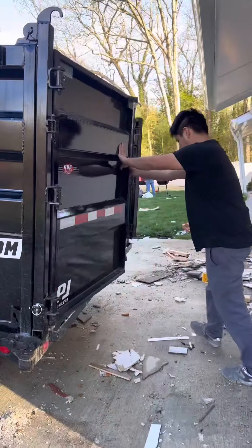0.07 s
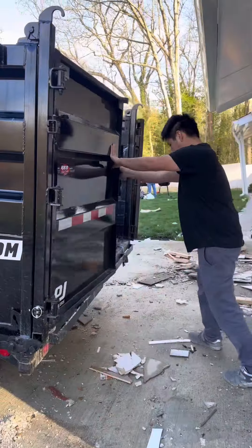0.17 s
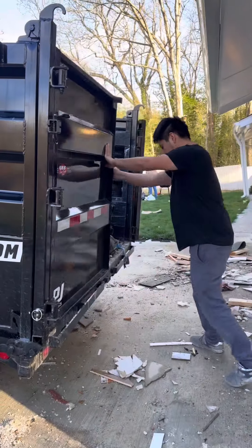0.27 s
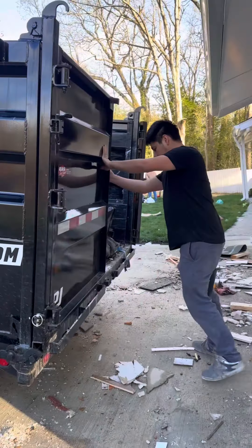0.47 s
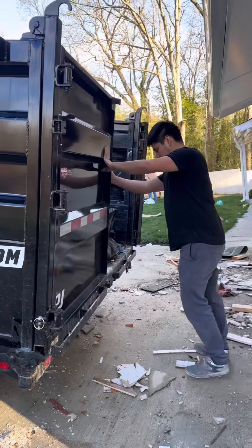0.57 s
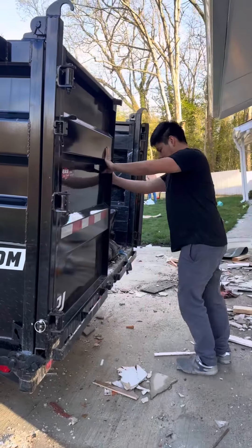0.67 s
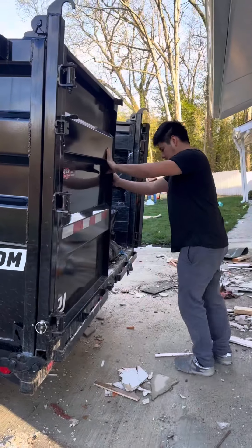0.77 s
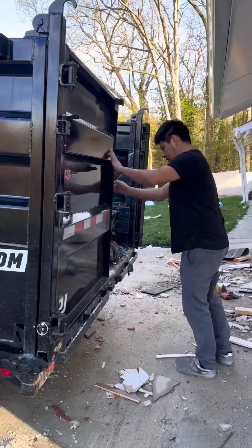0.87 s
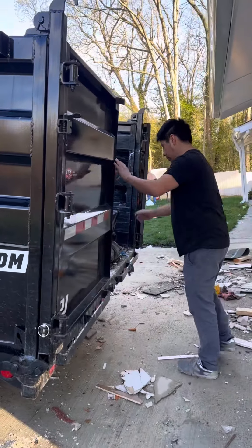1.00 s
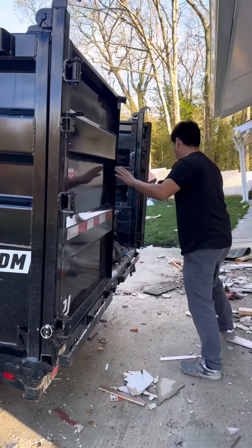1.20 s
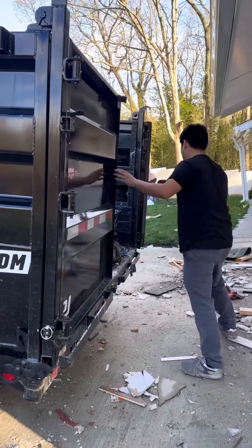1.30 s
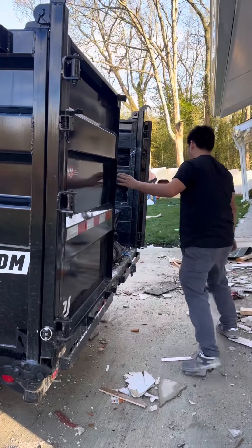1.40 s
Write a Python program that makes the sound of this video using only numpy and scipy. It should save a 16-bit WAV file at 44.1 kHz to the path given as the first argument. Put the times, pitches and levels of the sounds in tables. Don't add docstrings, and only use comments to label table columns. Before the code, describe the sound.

Big metal door bangs closed, its hardware chattering and ringing, then light scuffs and latch ticks

```python
import sys
import numpy as np
from scipy import signal
from scipy.fft import irfft
from scipy.io import wavfile
from scipy.ndimage import uniform_filter1d

SR = 44100
rng = np.random.default_rng(int(sys.argv[2]) if len(sys.argv) > 2 else 0)


def inscribe(sig):
    pcm = np.round(np.clip(np.atleast_2d(sig).T, -1, 1) * 32767)
    wavfile.write(sys.argv[1], SR, pcm.astype(np.int16))


def magnitude_from_level(level_db):
    exponent = np.asarray(level_db, float) / 20
    return 10 ** exponent


N = 63945

# start in seconds, force on panel in dB, force on loose hardware in dB.
CONTACTS = [(0.237, -23.5, -49.5), (0.2493, -9, -21), (.272, -12, -19), (0.287, -15, -20),
            (0.305, -10.5, -20), (0.317, -10.5, -20.5), (0.335, -11, -22), (0.354, -16, -22.5),
            (0.37, -13.5, -27), (.396, -14.5, -22.5), (0.426, -16.5, -26), (0.442, -19.5, -28.5),
            (0.466, -25.5, -38), (0.477, -22, -29), (0.507, -29, -46.5), (0.533, -45, -62),
            (0.567, -58, -73), (0.585, -50, -79)]
# frequency in Hz, level in dB per Hz.
PANEL_SPECTRUM = [(80, -16), (200, -6), (700, -11), (1500, -14), (3000, -19.5), (5000, -31), (10000, -46.5)]
# frequency in Hz, t60 in seconds.
PANEL_T60 = [(100, 0.36), (400, 0.29), (1200, 0.23), (4000, 0.048)]
# frequency in Hz, energy in dB, t60 in seconds.
TAIL_MODES = [(230.6, -19, 0.53), (272, -25, 3.6), (427, -25, 1.1), (623, -23, 1.6), (791, -30.5, 1),
              (1060, -31.5, 1.6)]
# frequency in Hz, level in dB per Hz.
HARDWARE_SPECTRUM = [(2000, -7.5), (3000, -13.5), (5000, -13.5), (6500, -7), (8200, -22), (10000, -34)]


def door():
    late_t60_s, late_cut_hz, hardware_t60_s = 1.104, 685, 0.1
    shapes = np.array([swell(row[0], rise_s=0.0018, fall_s=0.0093) for row in CONTACTS])
    chatter = [clicks(per_s=2500, spread_db=3) for _ in range(2)]
    panel_force, hardware_force = magnitude_from_level(np.array(CONTACTS)[:, 1:]).T @ shapes * chatter

    late_spectrum = [(hz, db - 20 * np.log10(1 + (hz / late_cut_hz) ** 2)) for hz, db in PANEL_SPECTRUM]
    panel = dense_body(PANEL_SPECTRUM, lambda hz: at_hz(PANEL_T60, hz), spots=5, length_s=0.5)
    late_panel = dense_body(late_spectrum, lambda hz: late_t60_s, spots=2, length_s=0.98)
    hardware = dense_body(HARDWARE_SPECTRUM, lambda hz: hardware_t60_s, spots=8, length_s=0.12)

    out = magnitude_from_level(0.5) * strike(panel_force, panel)
    out = out + magnitude_from_level(-7) * strike(panel_force, late_panel)
    out = out + magnitude_from_level(5) * strike(hardware_force, hardware)
    out = out + strike(panel_force, named_body(TAIL_MODES))
    rebound = burst(0.432, 0.006, 0.05, -20, 1800, width=1.4)
    return out + rings() + crack() + rebound


# start in seconds, frequency in Hz, peak in dB, swell in seconds, t60 in seconds.
RINGS = [(.25, 62.7, -12, 0.026, 0.17), (.35, 59, -20.5, 0.011, 0.24), (.43, 53, -26.5, .02, .5),
         (.585, 41, -28, 0.023, .6), (.252, 211, -13.5, 0.035, 0.16), (.34, 204, -14.5, 0.015, 0.17),
         (.39, 160, -23, .02, 0.44), (.583, 180, -30.5, 0.0054, 0.34), (.25, 102.4, -17.5, .008, 0.1),
         (0.299, 341, -16, .006, .25), (.43, 285, -20.5, 0.0098, .3), (.43, 425, -26, 0.017, .35),
         (.248, 455, -17, 0.0053, 0.18), (.345, 402, -24, .01, 0.24), (.262, 630, -14.5, .02, 0.12),
         (.505, 630, -30, .015, 0.28), (.246, 735, -12, 0.0013, 0.11), (.427, 610, -21, 0.013, 0.054),
         (.246, 900, -19.5, 0.0024, 0.14), (.325, 1007, -17, .1, .23), (.325, 1042, -16.5, .3, .29),
         (.33, 1314, -24, 0.027, 0.27), (.335, 1510, -24, 0.022, 0.34), (.31, 2370, -21.5, 0.015, 0.37),
         (.34, 1300, -22.5, 0.011, 0.22), (.422, 2500, -30.5, 0.017, 0.15), (.42, 1845, -21.5, .006, 0.18),
         (0.38, 2440, -30.5, 0.01, 0.14), (0.36, 3900, -26.5, .008, 0.066),
         (0.39, 3500, -24.5, 0.0034, 0.1), (0.62, 235, -35.5, 0.033, 0.52),
         (.39, 640, -22.5, 0.0033, 0.097), (0.27, 1400, -27.5, .02, .4), (0.25, 1000, -24.5, 0.0085, .2)]
# start in seconds, frequency in Hz, peak in dB, swell in seconds, t60 in seconds.
PINGS = [(1.324, 2340, -53, .005, .16), (1.344, 2600, -50, .001, .06), (1.3445, 540, -33, .001, .022),
         (1.4325, 2300, -47, .0005, .015), (1.443, 2320, -54, .001, .03), (1.19, 1950, -48, .006, .1),
         (.853, 1850, -47, .0005, .025), (.932, 1750, -52, .002, .04), (.9, 622, -55, .05, .6),
         (1.0, 1030, -62, .05, 1.5), (1.24, 520, -46, .008, .1)]


def rings():
    start_s, hz, peak_db, rise_s, t60_s = np.transpose(np.vstack([RINGS, PINGS]))[:, :, None]
    t = np.maximum(np.arange(N) / SR - start_s, 0)
    shape = (1 - np.exp(-t / rise_s)) * np.exp(-np.log(1000) * t / t60_s)
    shape = magnitude_from_level(peak_db) * shape / shape.max(axis=1, keepdims=True)
    waver_rad = 0.45 * np.array([drift(10) for _ in start_s])
    alike, lean = stereo(hz)
    turn = np.arccos(alike) / 2
    phase = 2 * np.pi * hz * t + waver_rad
    left = lean * shape * np.sin(phase - turn)
    right = shape * np.sin(phase + turn) / lean
    return np.array([left.sum(axis=0), right.sum(axis=0)])


# relative length, level in dB.
CRACK_PATHS = [(.85, -5), (1, 0), (1.35, -4), (1.7, -9)]


def crack():
    start_s, top_hz = 0.2422, 3400
    delay_1khz_s = 0.008
    hz = np.maximum(np.fft.rfftfreq(N, 1 / SR), 1)
    colour = (hz / 400) ** 2 / (1 + (hz / 400) ** 2) / (1 + (hz / top_hz) ** 4)
    late = sum(magnitude_from_level(db) * np.exp(-4j * np.pi * length * delay_1khz_s * np.sqrt(1000 * hz))
               for length, db in CRACK_PATHS)
    snap = irfft(colour * late * np.exp(-2j * np.pi * hz * start_s), N)
    return magnitude_from_level(-2) * snap / np.abs(snap).max() * magnitude_from_level([[1.5], [-1.5]])


# frequency in Hz, energy in dB, t60 in seconds.
HANDLE_MODES = [(3790, -8.5, 0.088), (3860, -3.5, 0.12), (4050, -7, .07), (6200, -6.5, .15),
                (7780, 8.5, 0.087), (8000, -1, .1), (8260, 7, 0.095)]


def latch():
    tick = np.zeros(N)
    tick[int(1.008 * SR)] = magnitude_from_level(-36)
    return strike(tick, named_body(HANDLE_MODES))


# peak in seconds, rise in seconds, fall in seconds, level in dB, centre in Hz.
SCUFFS = [(0.027, 0.0036, 0.0067, -54, 6000), (0.039, .002, 0.0035, -48, 5000),
          (0.061, 0.007, 0.024, -44.5, 6500), (0.101, 0.0037, 0.0085, -57, 7500),
          (0.212, 0.0022, 0.038, -50, 5100), (0.743, 0.036, 0.018, -53, 3560),
          (0.855, 0.0012, 0.019, -55, 5070), (1.195, .003, 0.027, -47.5, 4490),
          (1.234, 0.024, 0.018, -30, 4520), (1.264, 0.025, 0.022, -43, 5550),
          (1.345, .001, 0.012, -51.5, 5000), (0.93, 0.0016, 0.017, -65, 2970),
          (1.008, 0.0015, 0.018, -58, 6900)]
# peak in seconds, rise in seconds, fall in seconds, level in dB, centre in Hz.
KNOCKS = [(.075, 0.011, 0.012, -57, 824), (.138, .001, 0.02, -47, 1300), (.158, 0.012, 0.018, -45, 1500),
          (.177, 0.008, 0.012, -48, 1500), (0.853, 0.0011, 0.02, -48, 1820),
          (0.931, 0.0061, 0.019, -48.5, 1850), (1.249, 0.012, 0.028, -45, 560),
          (1.229, 0.014, 0.015, -42.5, 1250), (1.205, 0.017, 0.048, -40, 1950),
          (1.231, 0.0103, 0.024, -36, 2100), (1.334, 0.022, 0.032, -58, 2300),
          (1.35, 0.003, 0.012, -42, 474), (1.435, .002, 0.012, -54, 3200), (1.432, .002, .008, -53, 6840)]


def shoes():
    scuffs = sum(burst(*row, width=1.62) for row in SCUFFS)
    return scuffs + sum(burst(*row, width=1.5) for row in KNOCKS)


# frequency in Hz, level in dB per Hz.
RUMBLE_SPECTRUM = [(13, -67.5), (22, -29), (43, -6.5), (70, 0), (237, -18.5), (276, -27), (1050, -35.5),
                   (1790, -55), (2000, -51.5), (2600, -77), (4400, -120)]
# frequency in Hz, level in dB per Hz.
HISS_SPECTRUM = [(880, -34.5), (1500, -0.5), (1660, -8), (10000, -48), (13000, -66), (22000, -120)]
# frequency in Hz, level in dB per Hz.
RUSTLE_SPECTRUM = [(710, -66.5), (1200, -31.5), (2230, -6.5), (5100, -16), (6080, -8.5), (10000, -10.5),
                   (13000, -46), (22000, -120)]
# time in seconds, level in dB.
STIR = [(0, -58.5), (.22, -53), (0.551, -60.5), (0.871, -56.5), (.98, -62.5), (1.1, -70.5), (1.179, -77),
        (1.299, -54), (1.45, -57.5)]
# frequency in Hz, left-right likeness.
FAR_LIKENESS = [(60, 3), (130, -0.07), (290, 0.97), (640, 0.25), (1410, 0.8), (3100, 0), (6820, 0.4),
                (15000, -2.5)]


def yard():
    stir_db = np.interp(np.arange(N) / SR, *np.transpose(STIR))
    rumble = magnitude_from_level(-33.5) * banded_noise(RUMBLE_SPECTRUM, FAR_LIKENESS, patchy_db=2.5)
    hiss = magnitude_from_level(-83) * banded_noise(HISS_SPECTRUM, FAR_LIKENESS, patchy_db=-2.0)
    rustle = magnitude_from_level(stir_db) * banded_noise(RUSTLE_SPECTRUM, FAR_LIKENESS, patchy_db=2.0)
    return rumble + hiss + rustle


def strike(force, answers):
    spots = rng.integers(0, answers.shape[1], N) == np.arange(answers.shape[1])[:, None]
    return signal.fftconvolve((force * spots)[None], answers, axes=2)[..., :N].sum(axis=1)


def dense_body(spectrum, t60_at, spots, length_s):
    bloom_cycles = 0.46
    t, out = np.arange(int(length_s * SR)) / SR, 0
    white = rng.standard_normal((2, 2, spots, len(t)))
    for k, (low, high) in enumerate(half_octaves(64, 7.6, spectrum)):
        mid, side = bandpass(white[k % 2], low, high)
        hz = np.sqrt(low * high)
        alike, lean = stereo(hz)
        shape = np.exp(-np.log(1000) * t / t60_at(hz)) * (1 - np.exp(-t * hz / bloom_cycles))
        gain = magnitude_from_level(at_hz(spectrum, hz)) * shape / np.sqrt(np.sum(shape ** 2))
        side = np.sqrt(1 - alike) * turned(mid, side, hz)
        mid = np.sqrt(1 + alike) * mid
        out = out + gain * np.array([lean * (mid + side), (mid - side) / lean])
    return out / np.sqrt(np.sum(out ** 2) / 2 / spots)


def turned(mid, side, hz):
    share = 0.62
    quarter_turn = np.gradient(mid, axis=-1) / np.sin(2 * np.pi * hz / SR)
    return -share * quarter_turn + np.sqrt(1 - share ** 2) * side


def named_body(modes):
    hz, db, t60_s = np.transpose(modes)
    t = np.arange(SR // 2) / SR
    alike, lean = stereo(hz)
    turn = np.arccos(alike) / 2
    level = magnitude_from_level(db) / np.sqrt(t60_s * SR / (4 * np.log(1000)))
    weight = level * np.array([lean * np.exp(1j * turn), np.exp(-1j * turn) / lean])
    decaying = np.exp(np.outer(2j * np.pi * hz - np.log(1000) / t60_s, t))
    return (weight @ decaying).imag[:, None]


def burst(peak_s, rise_s, fall_s, db, hz, width):
    grit, own = clicks(per_s=4900, spread_db=-3.5), rng.standard_normal(N)
    alike, _ = stereo(hz)
    pair = np.sqrt(1 + alike) * grit + np.sqrt(1 - alike) * own * [[1], [-1]]
    band = bandpass(pair, hz / width, min(hz * width, 15000))
    return magnitude_from_level(db) * rms_one(band) * swell(peak_s, rise_s, fall_s)


def banded_noise(spectrum, likeness, patchy_db):
    out, together = 0, drift(8.2)
    settle = 8000
    white = rng.standard_normal((2, 2, N + settle))
    for k, (low, high) in enumerate(half_octaves(16, 9.6, spectrum)):
        mid, side = bandpass(white[k % 2], low, high)[:, settle:]
        hz = np.sqrt(low * high)
        alike = np.clip(at_hz(likeness, hz), -1, 1)
        gain = magnitude_from_level(at_hz(spectrum, hz) + patchy_db * (0.15 * together + drift(5.6)))
        out = out + gain * (np.sqrt(1 + alike) * mid + np.sqrt(1 - alike) * side * [[1], [-1]])
    return rms_one(out)


def clicks(per_s, spread_db):
    sizes = magnitude_from_level(spread_db * np.minimum(rng.exponential(1, N), 4)) * rng.choice([-1, 1], N)
    return rms_one(sizes * (rng.random(N) < per_s / SR))


def swell(peak_s, rise_s, fall_s):
    t = np.arange(N) / SR - peak_s
    return np.exp(np.where(t < 0, 2 * t / rise_s, -t / fall_s))


def drift(rate):
    r = np.exp(-80 * np.pi * rate / SR)
    slow = signal.lfilter([1], [1, -2 * r, r * r], rng.standard_normal(N // 40 + 2002))[2000:]
    return np.interp(np.arange(N) / 40, np.arange(len(slow)), rms_one(slow))


# frequency in Hz, left-right likeness.
LIKENESS = [(130, 1), (290, .9), (640, .75), (1410, .78), (3100, .55), (5500, .3), (9000, -.5)]
# frequency in Hz, left minus right in dB.
LEAN = [(200, 0.1), (500, 4.5), (1200, 5), (2400, 1.5), (8000, 0.1)]


def stereo(hz):
    return np.clip(at_hz(LIKENESS, hz), -1, 1), magnitude_from_level(at_hz(LEAN, hz) / 2)


def half_octaves(start_hz, octaves, spectrum):
    edges = start_hz * 2 ** np.arange(0, octaves, 0.5)
    edges = edges[edges > spectrum[0][0] / 2]
    return zip(edges, edges[1:])


def bandpass(x, low_hz, high_hz):
    return signal.sosfilt(signal.butter(2, [low_hz, high_hz], "band", fs=SR, output="sos"), x)


def at_hz(points, hz):
    table = np.array(points)
    return np.interp(np.log(hz), np.log(np.maximum(table[:, 0], 1)), table[:, 1])


def rms_one(x):
    return x / np.sqrt(np.mean(x ** 2) + 1e-20)


def scene():
    return door() + latch() + shoes() + yard()


def low_pass(x):
    return signal.sosfilt(signal.butter(12, 16780, fs=SR, output="sos"), x)


def record(dry):
    ceiling, top_hz, strip_db, strip_squeeze = 1.1, 9600, -25, 0.1
    mid = signal.sosfilt(signal.butter(2, 35, "high", fs=SR, output="sos"), dry.mean(axis=0))
    mono_below = signal.butter(4, 270, "high", fs=SR, output="sos")
    side = signal.sosfiltfilt(mono_below, (dry[0] - dry[1]) / 2)
    x = ceiling * np.tanh(np.array([mid + side, mid - side]) / ceiling)

    treble = signal.sosfilt(signal.butter(8, [7700, 8900], "band", fs=SR, output="sos"), x)
    power = uniform_filter1d(treble ** 2, size=1024).clip(0) + 1e-9
    treble = treble * power ** (-strip_squeeze / 2)
    strip = 2 * treble * np.cos(2 * np.pi * 6900 * np.arange(N) / SR) * [[1], [-1]]
    strip = signal.sosfilt(signal.butter(6, 13000, "high", fs=SR, output="sos"), strip)
    x = signal.sosfilt(signal.ellip(12, 1, 60, top_hz, fs=SR, output="sos"), x)
    return low_pass(x + magnitude_from_level(strip_db) * strip)


dry = scene()
out = record(dry)
inscribe(out)
```